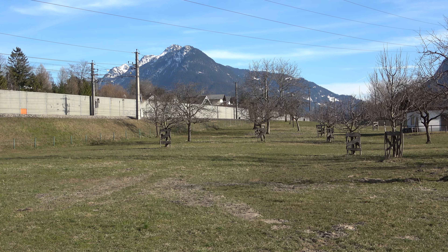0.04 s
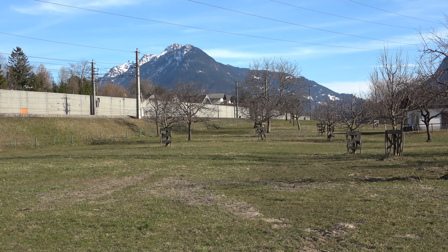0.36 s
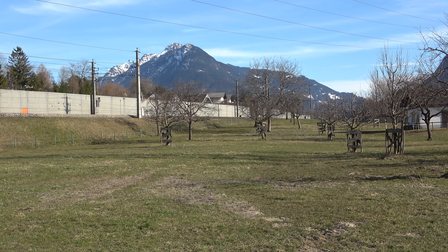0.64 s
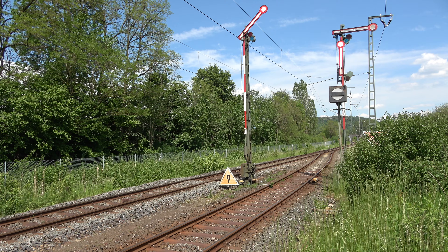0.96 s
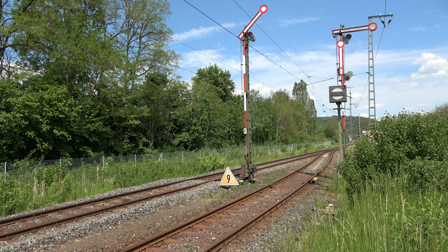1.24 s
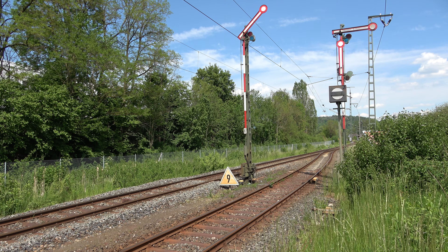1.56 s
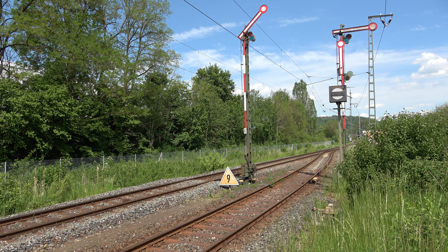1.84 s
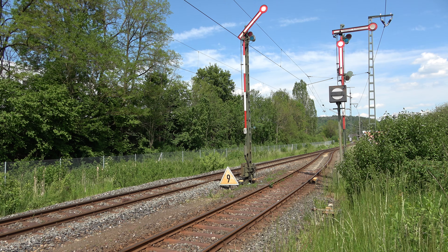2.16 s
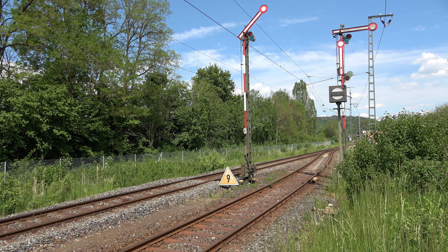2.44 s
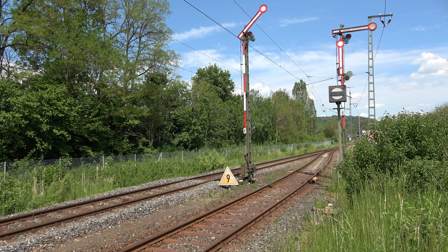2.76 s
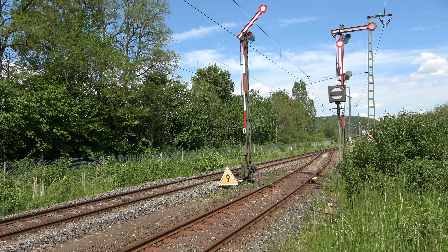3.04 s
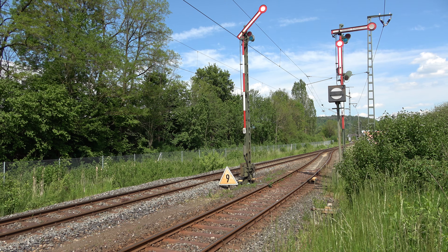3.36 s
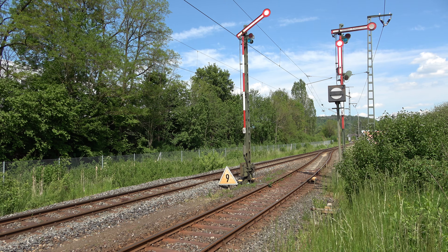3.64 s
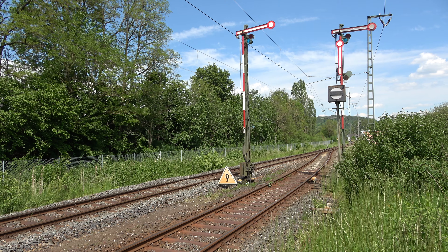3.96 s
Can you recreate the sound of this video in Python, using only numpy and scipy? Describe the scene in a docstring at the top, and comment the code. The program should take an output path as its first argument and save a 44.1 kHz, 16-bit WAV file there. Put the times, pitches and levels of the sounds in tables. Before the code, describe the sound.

A railway signal arm moves with a loud metallic clatter near the end. Before it, wind and a distant road rumble over a meadow, then give way abruptly to a quieter trackside with a faint engine hum.

```python
"""Windy meadow, then a railway signal

Wind rumbles over a meadow while tyres roar on a road far off to the right. The scene changes abruptly
to a quiet railway line where a distant engine and a motor drone. Then a semaphore signal is pulled:
its linkage takes up slack, jerks and rattles, and the arm bangs the steel mast as it starts to drop."""
import sys
import numpy as np
from scipy import signal
from scipy.fft import rfft, irfft, next_fast_len
from scipy.io import wavfile
from scipy.ndimage import map_coordinates

SR = 44100
rng = np.random.default_rng(int(sys.argv[2]) if len(sys.argv) > 2 else 0)


def pcm_store(signal):
    """Save signal as 16-bit PCM."""
    levels = np.round(np.clip(np.atleast_2d(signal), -1, 1) * 32767)
    wavfile.write(sys.argv[1], SR, levels.astype(np.int16).T)


N = 176400
CUTOFF_HZ = 15850


def linkage():
    """Each blow cracks, rattles on in loose joints, and rings its own part and the shared rods."""
    # blows: start_s, level_db, extra_weight_db, extra_top_db, fade_s, part_pitch_hz
    blows = [(3.415, -46.5, 1.5, 0, 0.49, 1320), (3.484, -43.5, 7, 7, 0.47, 6400),
             (3.505, -24.5, -2, 8.5, 0.065, 6630), (3.512, -24.5, 0.5, -30, 0.24, 780),
             (3.549, -35, 10.5, 4, 0.18, 414), (3.585, -33, 2.5, -9, 0.37, 2300),
             (3.61, -17.5, -5.5, 8, 0.097, 2720), (3.625, -31.5, 4, 1, 1, 7000),
             (3.684, -27, 1.5, -20, .18, 2530), (3.73, -20, -7, -3, 0.13, 4300),
             (3.753, -32.5, 1.5, -6, 0.8, 2920), (3.814, -21.5, -4, 4, 0.076, 13100),
             (3.819, -25.5, -1.5, 4, 0.82, 6170), (3.851, -26, 6.5, 0, 0.22, 1400),
             (3.858, -25.5, 0.5, -9, 0.21, 1480), (3.884, -30, 7.5, -22, 0.73, 830),
             (3.922, -26, 0, 0, 0.27, 2650), (3.934, -26.5, 1, -1, 0.13, 6720),
             (3.975, -38, 11.5, -6, 0.26, 620)]
    # tone colour of the steelwork: pitch_hz, gain_db
    steel = [(60, -12), (300, -7), (400, 0), (850, 0), (1100, -4.5), (1450, -2.5), (2100, -9), (2800, -4.5),
             (3250, -10.5), (3700, -8.5), (7200, -15), (8300, -23), (10000, -30), (12300, -26.5),
             (14300, -35), (15800, -41)]
    # ringing notes of the linkage: pitch_hz, level_db, fade_s
    notes = [(205, -11.5, .75), (405, -8.5, .42), (572, -7.5, .3), (2350, -16, .22)]
    t = np.arange(SR // 2) / SR
    out, rods = np.zeros(N), metal_shimmer(t)
    steel_gain = 1 / np.sqrt(np.mean(amp(along(steel, np.linspace(0, SR / 2, len(t)))) ** 2))
    for start_s, level_db, weight_db, top_db, fade_s, part_hz in blows:
        tone = [(1380, weight_db), (2600, 0), (5700, 0), (11100, top_db)]
        colour_db = lambda hz: along(tone, hz) + part_resonance(hz, part_hz)
        force = rattle(t, fade_s) + amp(5.5) * cracks(t, fade_s)
        metal = (rods + metal_shimmer(t)) / np.sqrt(2)
        clank = force + amp(-2.5) * signal.fftconvolve(force, metal)[:len(t)]
        clank = steel_gain * coloured(clank, lambda hz: along(steel, hz) + colour_db(hz))
        ring = amp(-4.5) * ringing(notes, t, colour_db(np.transpose(notes)[0]))
        add(out, start_s, amp(level_db) * (clank + ring))
    return out


def part_resonance(hz, part_hz, boost_db=4, width_octaves=0.23):
    """The boost in dB that a struck part gives to sound near its own pitch."""
    return boost_db * np.exp(-.5 * (np.log2((hz + 1) / part_hz) / width_octaves) ** 2)


def rattle(t, fade_s, changes_per_s=330, depth_db=3.3, rise_s=.003):
    """Loose joints chatter: fading noise whose level jumps about quickly."""
    chatter = np.interp(t * changes_per_s, np.arange(len(t)), rng.standard_normal(len(t)))
    contacts = unit(rng.standard_normal(len(t)) * amp(depth_db * chatter))
    return contacts * (1 - np.exp(-t / rise_s)) * fade(t, fade_s)


def cracks(t, fade_s, lowest_hz=4600, bounces_per_s=45):
    """The first contact is a thin tick; weaker ones follow at random as loose pins bounce."""
    highpass = signal.butter(2, lowest_hz, "high", fs=SR)
    bright_noise = signal.lfilter(*highpass, rng.standard_normal(len(t)))
    hits = (rng.random(len(t)) < bounces_per_s / SR) * fade(t, fade_s)
    hits[0] = 1
    energy = signal.fftconvolve(hits ** 2, fade(t, fade_s=.014) ** 2)[:len(t)]
    return bright_noise * np.sqrt(abs(energy))


def metal_shimmer(t, count=450, lowest_hz=1600):
    """A struck rod or plate rings at very many close pitches; the total energy is 1."""
    hz = rng.uniform(lowest_hz, CUTOFF_HZ, count)
    spectrum = np.zeros(len(t) // 2 + 1, complex)
    spectrum[(hz * len(t) / SR).astype(int)] = np.exp(2j * np.pi * rng.random(count))
    ring = irfft(spectrum) * fade(t, fade_s=.095)
    return ring / np.linalg.norm(ring)


def ringing(notes, t, colour_db=0, scatter_db=1.5, rise_s=0.0049):
    """The fading notes of struck metal, each a little louder or softer from blow to blow."""
    hz, level_db, fade_s = np.transpose(notes)
    sizes = amp(level_db + colour_db + scatter_db * rng.standard_normal(len(hz)))
    phases = 2 * np.pi * (hz[:, None] * t + rng.random((len(hz), 1)))
    waves = fade(t, fade_s[:, None]) * np.sin(phases)
    return (1 - np.exp(-t / rise_s)) * (sizes @ waves)


def mast_bangs():
    """The signal arm bangs the steel mast and sets it ringing."""
    # bangs of the arm: start_s, level_db
    bangs = [(3.852, -33), (3.859, -24), (3.932, -34)]
    # ringing notes of the mast: pitch_hz, level_db, fade_s
    notes = [(500, -5, .45), (696, -7, .45), (785, -9, .45), (856, -5, .55), (1306, -2, .3),
             (1462, 1.5, .17), (1514, 0, .27), (2670, -8, .35), (3009, -9, .35), (5872, -13, .4)]
    t = np.arange(SR // 2) / SR
    out = np.zeros(N)
    for start_s, level_db in bangs:
        add(out, start_s, amp(level_db) * ringing(notes, t))
    return out


def latch_and_crank(latch_s=3.42, latch_db=-44):
    """The latch pings as it lifts, then the crank knocks against its stop."""
    # ringing notes of the latch and the crank: pitch_hz, level_db, fade_s
    latch_notes = [(1310, 0, .2)]
    crank_notes = [(552, 0, .15), (970, -10, .3), (1125, -2, .22)]
    # knocks of the crank: start_s, level_db
    knocks = [(3.508, -24.5), (3.586, -30.5)]
    t = np.arange(SR // 2) / SR
    out = np.zeros(N)
    add(out, latch_s, amp(latch_db) * ringing(latch_notes, t))
    for start_s, level_db in knocks:
        add(out, start_s, amp(level_db) * ringing(crank_notes, t))
    return out


def loose_pins():
    """Loose pins tick: each is a tiny burst of noise with a short metal ring."""
    # ticks of the pins: start_s, level_db
    ticks = [(3.377, -58), (3.436, -48), (3.552, -33), (3.614, -21), (3.727, -29), (3.785, -31),
             (3.85, -25), (3.934, -25), (3.972, -27)]
    colour_db = lambda hz: along([(1000, -5), (7500, 0.5), (16000, -15.5)], hz)
    t = np.arange(SR // 2) / SR
    out = np.zeros(N)
    for start_s, level_db in ticks:
        click = rng.standard_normal(len(t)) * fade(t, fade_s=0.02)
        ring = signal.fftconvolve(click, metal_shimmer(t))[:len(t)]
        add(out, start_s, amp(level_db) * coloured(click + ring, colour_db))
    return out


def tree_echo(x):
    """The trees scatter the sound back as a blurred echo, different in each ear."""
    t = np.arange(SR // 2) / SR
    tail = rng.standard_normal((2, len(t))) * fade(t, fade_s=.4)
    return signal.fftconvolve(x[None], tail / np.linalg.norm(tail[0]), axes=1)[:, :N]


def meadow(tick_s=.538):
    """Tyres roar from the right, the wind rumbles in lumps, and something ticks once."""
    # tone colours of the road and the wind: pitch_hz, gain_db
    road_colour = [(150, -5.5), (300, -9), (450, -2), (1200, 1.5), (2200, -7.5), (3100, -16), (7500, -37.5),
                   (12000, -58)]
    wind_colour = [(30, -1.5), (110, 1.5), (170, -7), (260, -10.5), (400, -35), (700, -42), (5000, -57)]
    # where the road is heard: pitch_hz, left_minus_right_db
    road_balance = [(250, 2), (700, -28), (1300, -22), (2200, -21), (6000, -9)]
    t = np.arange(N) / SR
    road = placed(rush(road_colour, side_db=-6.5), road_balance) * amp(-39.5 + .35 * wobble(18.6))
    wind = rush(wind_colour, side_db=-23) * amp(-37 + 2.0 * wobble(23.1)) * pan(left_db=1.0)
    tick_noise = rush([(1000, -12), (4500, 7), (9000, -5), (15000, -11)], side_db=-4)
    tick = tick_noise * (t > tick_s) * fade(abs(t - tick_s), fade_s=0.034)
    return road + wind + amp(-50) * tick


def far_machines(engine_hz=35.25, motor_hz=119.3):
    """An engine and a motor hum at multiples of their turning speeds, swelling and fading."""
    # loudness of the hums: time_s, engine_db, engine_third_db, motor_db, motor_octave_db
    levels = [(1.25, -52.5, -66, -68, -57), (1.5, -51, -51.5, -69, -51), (1.78, -49, -51.5, -56, -63.5),
              (2.05, -45, -54, -70, -53.5), (2.3, -47, -56.5, -65, -47), (2.58, -51, -45, -62, -59.5),
              (2.85, -52, -47.5, -46.5, -61.5), (3.25, -50, -51, -50.5, -53),
              (3.55, -44.5, -54.5, -62, -68.5)]
    engine_db, third_db, motor_db, octave_db = curves(levels)
    fourth_db = (engine_db + third_db) / 2 - 5
    engine = drone(2 * engine_hz, engine_db + 0.5) + drone(6 * engine_hz, engine_db - 8.5)
    engine += drone(3 * engine_hz, third_db) + drone(4 * engine_hz, fourth_db)
    motor = drone(motor_hz, motor_db) + drone(2 * motor_hz, octave_db) * pan(left_db=4.0)
    return engine * pan(left_db=.5) + motor


def drone(hz, level_db, waver_db=1, drift_radians=0.3):
    """One slightly unsteady tone of a far machine."""
    phase = 2 * np.pi * (hz * np.arange(N) / SR + rng.random()) + drift_radians * wobble(6.48)
    return np.sqrt(2) * amp(level_db + waver_db * wobble(8.9)) * np.sin(phase)


def whoosh(peak_s=2.37, width_s=0.12, pitch_hz=352):
    """A soft, far whoosh a little to the left: a band of noise swells and dies away."""
    swell = np.exp(-.5 * ((np.arange(N) / SR - peak_s) / width_s) ** 2)
    band = [(pitch_hz / 2, -20), (pitch_hz, 0), (pitch_hz * 2, -22), (pitch_hz * 10, -70)]
    return amp(-55.5) * swell * rush(band, side_db=-24) * pan(left_db=1.5)


def far_traffic():
    """Far traffic fills the air by the track with a low, gently wavering rush."""
    # tone colour of the trackside air: pitch_hz, gain_db
    colour = [(20, -5), (100, -3.5), (270, -7), (400, -14.5), (850, -15), (1100, -17.5), (1400, -27.5),
              (4000, -39), (9000, -44)]
    # where it is heard: pitch_hz, left_minus_right_db
    balance = [(200, -2), (700, 5.5), (950, 7), (1200, -14), (1700, -1)]
    return placed(rush(colour, side_db=-11.5), balance) * amp(-49.5 + 0.95 * wobble(4.6))


def hiss():
    """A faint, even, high hiss."""
    # tone colour of the hiss: pitch_hz, gain_db
    colour = [(4000, -14), (6000, 5), (15000, -1)]
    return amp(-69) * rush(colour, side_db=2.0)


def amp(db):
    """Turn decibels into a gain to multiply by."""
    return 10 ** (np.asarray(db) / 20)


def unit(x):
    """Scale a sound to an average power of 1."""
    return x / np.sqrt(np.mean(x ** 2) + 1e-20)


def along(points, hz):
    """Read between (pitch_hz, value) points, with octaves evenly spaced."""
    pitches, values = np.transpose(points)
    return np.interp(np.log(hz + 1), np.log(pitches + 1), values)


def curves(rows):
    """One value per sample for each column after the time."""
    times_s, *columns = np.transpose(rows)
    return [np.interp(np.arange(N) / SR, times_s, column) for column in columns]


def wobble(points_per_s):
    """A smooth curve through random points."""
    position = np.arange(N) * points_per_s / SR
    return map_coordinates(rng.standard_normal(4096), [position], mode="mirror")


def filtered(x, gain_at):
    """Multiply each frequency in a sound by gain_at(hz)."""
    size = next_fast_len(N + SR // 2)
    return irfft(rfft(x, size) * gain_at(np.fft.rfftfreq(size, 1 / SR)), size)[..., :N]


def coloured(x, colour_db):
    """Change the tone colour of a short sound by colour_db(hz)."""
    size = 2 * len(x)
    cepstrum = irfft(np.log(amp(colour_db(np.fft.rfftfreq(size, 1 / SR)))))
    # fold the filter forward in time, so nothing rings before the hit
    cepstrum[1:size // 2] *= 2
    cepstrum[size // 2 + 1:] = 0
    return irfft(rfft(x, size) * np.exp(rfft(cepstrum)))[:len(x)]


def pan(left_db):
    """Gains for the two ears that make the left louder by left_db."""
    return amp(np.array([[left_db], [-left_db]]) / 2)


def placed(x, balance):
    """Share each frequency between left and right, keeping its total power."""
    def gains(hz):
        ratio = amp(along(balance, hz))
        return np.array([ratio, np.ones_like(ratio)]) * np.sqrt(2) / np.hypot(ratio, 1)
    return filtered(x, gains)


def rush(colour, side_db):
    """Stereo noise of power 1, shaped by (pitch_hz, gain_db) points; more side_db sounds wider."""
    mid, side = filtered(rng.standard_normal((2, N)), lambda hz: amp(along(colour, hz)))
    return unit(np.array([mid + amp(side_db) * side, mid - amp(side_db) * side]))


def fade(t, fade_s):
    """Die away by 60 dB every fade_s seconds."""
    return np.exp(-np.log(1000) * t / fade_s)


def add(track, start_s, x):
    """Mix a sound into the track, beginning at start_s."""
    part = track[round(start_s * SR):][:len(x)]
    part += x[:len(part)]


def scene(change_s=.838, crossfade_s=.005):
    """The meadow, then the railway line with its signal; a faint hiss throughout."""
    railway_share = np.clip((np.arange(N) / SR - change_s) / crossfade_s + .5, 0, 1)
    clatter = linkage() + mast_bangs() + latch_and_crank() + loose_pins()
    trackside = far_machines() + whoosh() + far_traffic()
    railway = trackside + clatter * pan(left_db=-1) + amp(-17) * tree_echo(clatter)
    return (1 - railway_share) * meadow() + railway_share * railway + hiss()


def record(dry):
    """Remove the very highest treble, above CUTOFF_HZ."""
    return filtered(dry, lambda hz: hz < CUTOFF_HZ)


dry = scene()
out = record(dry)
pcm_store(out)
```